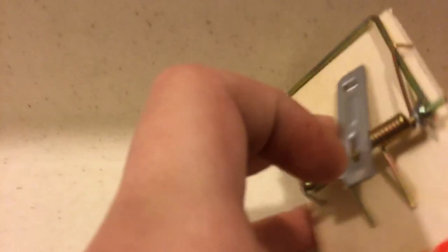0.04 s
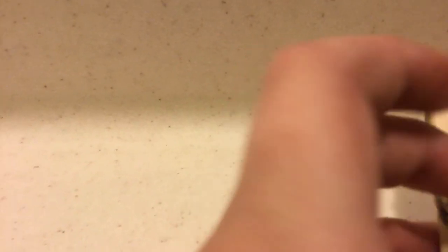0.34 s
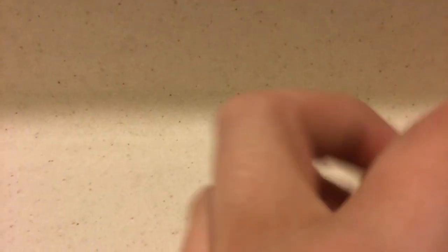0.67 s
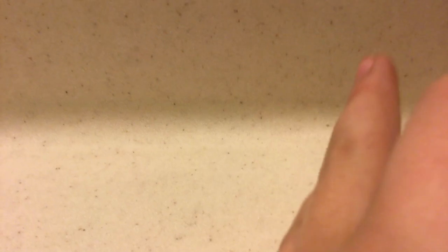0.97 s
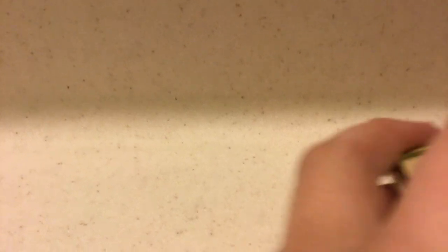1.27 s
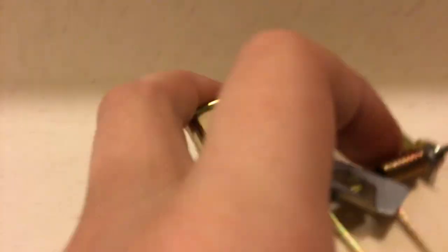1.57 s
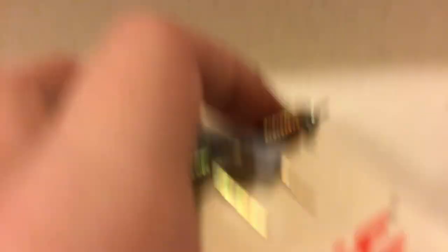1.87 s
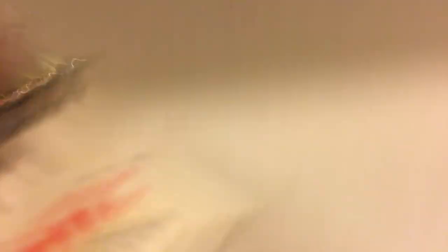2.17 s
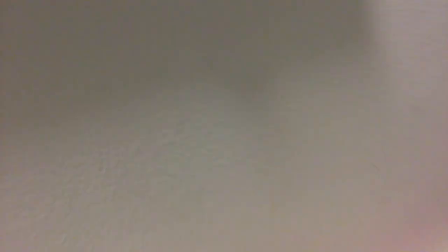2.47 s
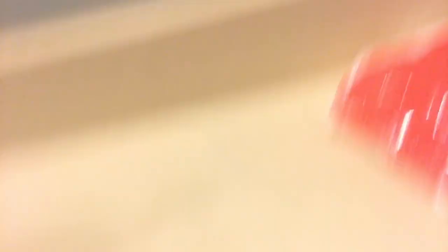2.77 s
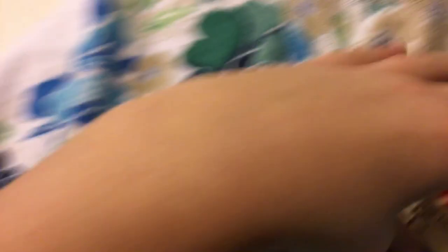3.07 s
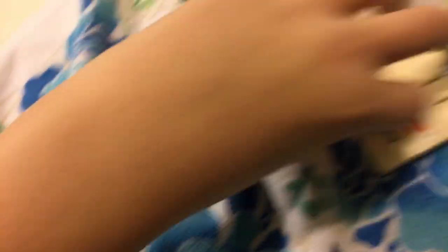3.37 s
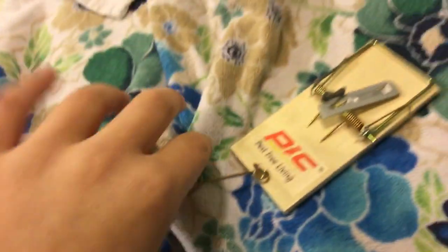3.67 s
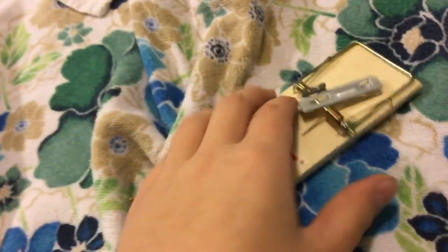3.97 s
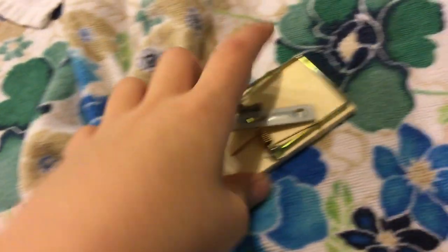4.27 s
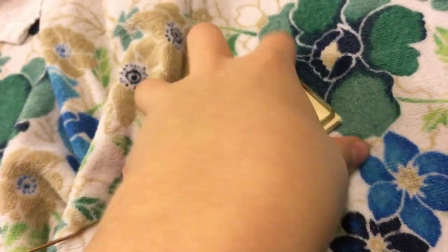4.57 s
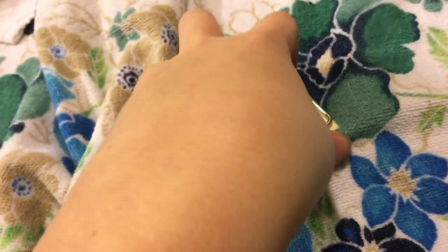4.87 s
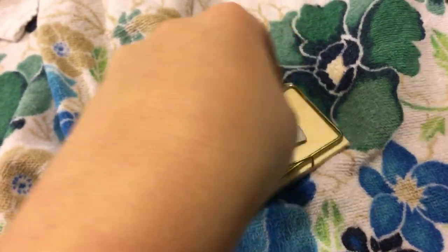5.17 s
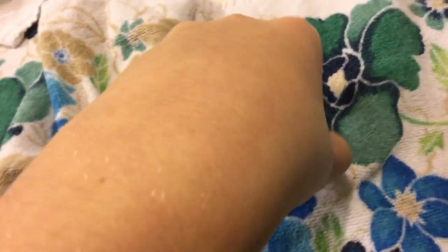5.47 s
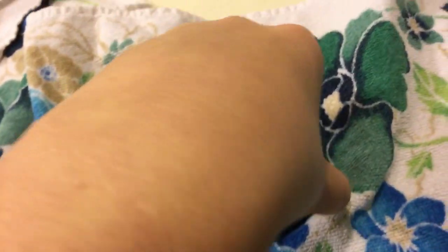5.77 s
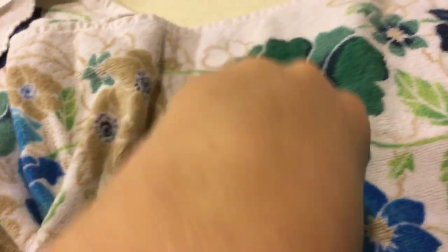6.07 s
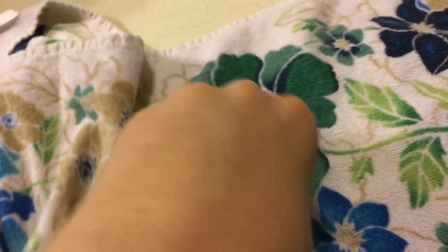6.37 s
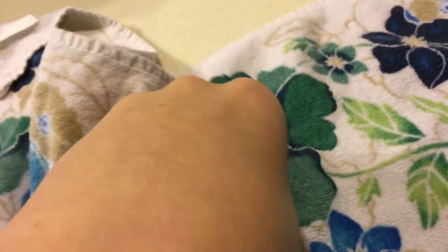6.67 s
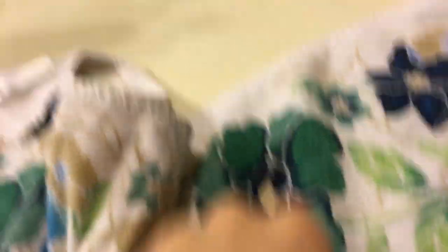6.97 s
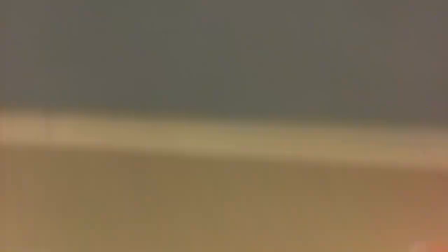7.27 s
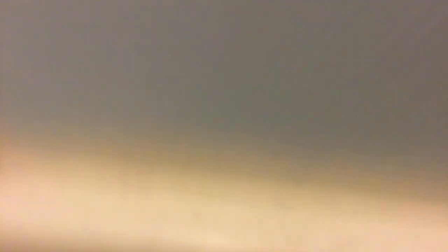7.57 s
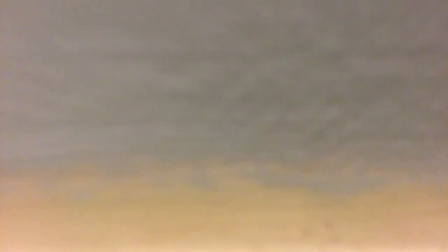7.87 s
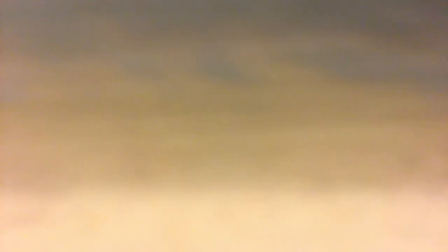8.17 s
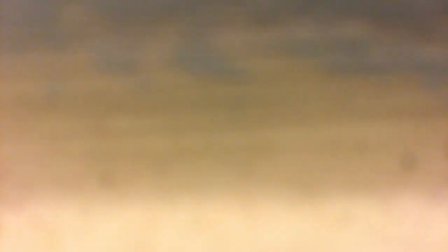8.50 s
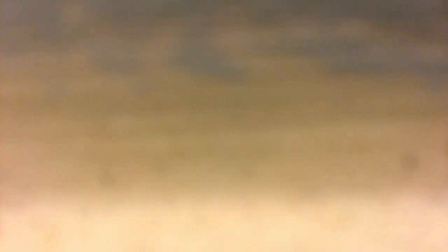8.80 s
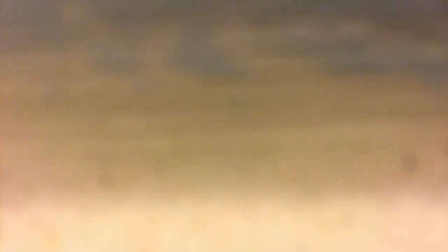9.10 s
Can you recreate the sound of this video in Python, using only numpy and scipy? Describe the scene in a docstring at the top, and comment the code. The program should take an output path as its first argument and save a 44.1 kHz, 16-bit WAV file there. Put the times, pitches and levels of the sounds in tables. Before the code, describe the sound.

A wooden mouse trap is handled close to a hand-held microphone in a small, quiet room. For the first 1.2 seconds its wires click and rattle lightly, with a faint wooden scrape and a small metal jingle. Soft skin rubbing, muffled bumps and fingernail taps follow, leading to a loud, sharp knock on the microphone at 2.3 seconds and a brief, faint, low finger squeak. From 2.7 to 4.2 seconds the trap clinks and rattles again, sharpest at about 3.1 and 3.4. It is then nudged on cloth, giving sparse faint ticks, tiny pings and a very soft rustle, with clearer clicks around 7 seconds. From 7.8 to 8.4 seconds the microphone is set down with loud, overloaded knocks: two heavy thumps, then a quick clattering cluster with rubbing. A few faint ticks follow over low room hush until about 9 seconds.

```python
"""Handling a mouse trap

In a small room, close to a hand-held phone, a spring-loaded wooden mouse trap is picked up from a
counter and nudged about on a cloth. Its loose wires chatter on the board and ring the spring, the bait
pedal and the holding bar; skin and cloth rub. The hand bumps the phone, and near the end sets it down
with knocks that overload the microphone."""
import sys
import numpy as np
from scipy import signal
from scipy.fft import rfft, irfft
from scipy.io import wavfile
from scipy.ndimage import map_coordinates

SR = 44100
rng = np.random.default_rng(int(sys.argv[2]) if len(sys.argv) > 2 else 0)


def store_pcm(level_fs):
    """Save levels as 16-bit WAV."""
    pcm = np.round(np.clip(level_fs, -1, 1) * 32767).astype(np.int16)
    wavfile.write(sys.argv[1], SR, np.atleast_2d(pcm).T)


N = 403074
TIME = np.arange(N) / SR
OFF_COUNTER_S, ON_CLOTH_S = 1.3, 3.25  # the trap leaves the counter, then lands on the cloth


# Wire chatter on the board. Each row: start in seconds, length in seconds, relative level in dB.
RATTLES = [(0.0795, 0.0012, -16), (0.103, 0.0047, -30), (0.121, 0.033, -39), (0.133, 0.00072, -36),
           (0.148, 0.0031, -26), (0.186, 0.0024, -26), (0.259, 0.00074, -29), (0.7477, 0.0082, -27),
           (0.7575, 0.0093, -19), (0.807, 0.0078, -37.5), (0.958, 0.0084, -29.5), (0.994, 0.003, -17.5),
           (1.005, 0.0014, -26), (1.05, 0.00048, -42), (1.1015, 0.00088, -44), (1.194, 0.0031, -33.5),
           (2.697, 0.003, -39), (2.711, 0.0077, -31.5), (2.764, 0.041, -41.5), (3.002, 0.012, -46),
           (3.025, 0.0044, -39.5), (3.041, 0.0049, -40), (3.078, 0.0018, -35), (3.127, 0.0034, -14.5),
           (3.327, 0.013, -35.5), (3.357, 0.15, -38.5), (3.405, 0.011, -28.5), (3.43, 0.0034, -20.5),
           (3.52, 0.0077, -30.5), (3.618, 0.055, -45.5), (3.683, 0.0079, -34), (4.096, 0.011, -41.5),
           (4.128, 0.0014, -29.5), (4.156, 0.015, -33.5), (4.597, 0.0093, -50.5), (4.671, 0.00084, -35),
           (5.254, 0.016, -43), (5.276, 0.046, -53.5), (5.366, 0.013, -49), (5.484, 0.045, -40.5),
           (5.8, 0.01, -59), (6.161, 0.012, -51.5), (6.615, .012, -64), (6.911, 0.019, -45.5),
           (6.991, 0.0057, -39), (7.118, 0.039, -46.5), (7.475, 0.054, -51), (8.534, 0.087, -59)]
# Wire on wire, the board silent. Each row: start in seconds, relative level in dB.
LONE_TICKS = [(0.345, -40.5), (0.598, -35), (2.454, -45.5), (6.939, -26), (8.544, -38.5), (9.058, -48)]
# Pings of the loose holding bar. Each row: start in seconds, level in dB.
BAR_PINGS = [(4.671, -52), (5.258, -57), (5.483, -49), (7.133, -50.5)]
# Modes of the spring with its bail, and of the bar. Each row: frequency in Hz, gain in dB, t60 in seconds.
SPRING_MODES = [(2055, -3, 0.076), (2876, -1, 0.065), (4770, -5, 0.038), (6800, -8, 0.064),
                (8470, -3.5, 0.054), (12900, -4, 0.067)]
BAR_MODES = [(8620, 8.5, 0.23), (11300, -7, .15), (15200, -4, .15)]
# Tone of struck wire, board and counter. Each row: frequency in Hz, gain in dB.
WIRE_COLOUR = [(4500, -33), (6500, -7.5), (9000, 6.5), (12000, 8.5), (16000, -4)]
WOOD_COLOUR = [(150, -28.5), (900, -20.5), (1400, -2.5), (2200, 2), (4200, -2), (6000, -1.5), (8000, -27.5)]
COUNTER_COLOUR = [(90, -26.5), (280, 3.5), (500, -11.5), (1500, -4.5), (4000, -39)]

def trap(wire_t60=0.0043, drag_s=0.0065, cloth_db=-7.5):
    """Close by, wire chatter ticks on metal and wood and rings the spring; the holding bar pings."""
    track = np.zeros(N)
    lead, t, ring_t = seconds(.04), seconds(.16), seconds(.3)
    for start, length, level_db in RATTLES:
        length = max(length, .0005)
        # light touches are duller, with more wood than wire; the cloth muffles the board
        wood_db = -22 + 0.48 * level_db + cloth_db * (start > ON_CLOTH_S)
        # the wire drags, slips free and bounces, then the shaken parts settle
        drag = undb(-20) * unit(rng.standard_normal(len(lead)) * np.exp(-lead[::-1] / drag_s))
        burst = unit(chatter(t, length, bounce_s=0.00091, scatter_db=6, sag_db=-7))
        settling = undb(-14) * unit(chatter(t, 0.17, bounce_s=0.0021, scatter_db=2.5, sag_db=-39))
        force = np.concatenate([drag, burst + settling])
        parts = [(tick(ring_t, WIRE_COLOUR, t60=wire_t60), level_db),
                 (tick(ring_t, WOOD_COLOUR, t60=0.025), wood_db),
                 (ring(SPRING_MODES, ring_t, scatter_db=4.5, detune=0.015), level_db - 12),
                 (coil(ring_t), level_db - 6)]
        if start < OFF_COUNTER_S:
            parts.append((tick(ring_t, COUNTER_COLOUR, t60=0.047), wood_db - 12))
        weight = np.sqrt((length + 0.0012) * SR)  # a longer burst carries more energy
        for response, db in parts:
            add(track, start - lead[-1], weight * undb(db) * unit(signal.fftconvolve(force, response)))
    for start, db in LONE_TICKS:
        add(track, start, undb(db + 22) * unit(tick(ring_t, WIRE_COLOUR, t60=wire_t60)))
    for start, db in BAR_PINGS:
        add(track, start, undb(db) * ring(BAR_MODES, ring_t))
    return track


def chatter(t, length, bounce_s, scatter_db, sag_db):
    """Force of a wire that lands and bounces on for a while."""
    gaps, sizes = rng.uniform(.2, 1.8, 256), rng.standard_normal(256)
    starts = (np.cumsum(gaps) - gaps[0]) * bounce_s
    gains = undb(scatter_db * sizes + sag_db * starts / length) * (starts < length)
    return np.bincount((starts * SR).astype(int), gains, len(t))[:len(t)]


def tick(t, points, t60, buzz_db=-27, buzz_t60=0.038):
    """Close, quickly damped modes blur into coloured noise; loose parts buzz faintly after."""
    envelope = fade(t, t60) + undb(buzz_db) * fade(t, buzz_t60)
    return colour(rng.standard_normal(len(t)) * envelope, points)


def coil(t, low_hz=1800, high_hz=15000, count=40, t60=.04):
    """The coil has many close modes that die fast; every contact wakes a different set."""
    modes = [(hz, 0, t60) for hz in rng.uniform(low_hz, high_hz, count)]
    return ring(modes, t, scatter_db=0.5)


# Shakes of the bait pedal. Each row: start in seconds, length in seconds, relative level in dB.
JINGLES = [(0.7444, 0.02, -38), (2.766, 0.015, -51.5), (3.314, 0.0041, -53), (3.329, 0.0087, -49.5),
           (3.349, 0.018, -49), (3.384, 0.077, -52)]
# Its modes. Each row: frequency in Hz, gain in dB.
PEDAL_MODES = [(2625, 8.5), (4183, -0.5), (5650, -8), (9085, 15.5), (11500, 8), (13745, 2.5)]

def pedal(t60=0.051):
    """The bait pedal bounces on its hinge and jingles in the same few clear modes each time."""
    track, t = np.zeros(N), seconds(.2)
    for start, length, level_db in JINGLES:
        force = chatter(t, length, bounce_s=.002, scatter_db=3, sag_db=0)
        weight = np.sqrt((length + t60 / 10) * SR)
        for hz, db in PEDAL_MODES:
            mode = np.sin(2 * np.pi * hz * t) * fade(t, t60)
            add(track, start, weight * undb(level_db + db) * unit(signal.fftconvolve(force, mode)))
    return track


# Pushes on the board. Each row: start in seconds, length in seconds, level in dB.
PUSHES = [(0, 0.24, -46), (0.33, 0.048, -45.5), (0.46, 0.28, -44.5), (3.58, 0.12, -51), (4.1, 0.11, -56.5)]
# Its resonances. Each row: frequency in Hz, width in Hz, gain in dB.
BOARD_RESONANCES = [(2000, 88, -8), (4400, 940, -12), (5680, 220, -4.5), (8800, 870, -12.5),
                    (12100, 1600, -14)]

def board_scrape():
    """The pushed board scrapes in fine ticks and sings in one resonance after another."""
    slips = friction(grain_db=7.5, flutter_db=2.5, flutter_rate=110)
    song = resonate(slips, BOARD_RESONANCES, sway_db=3.5, drift=.008)
    return song * gestures(PUSHES, attack_share=0.19, release_share=0.99, rest_db=-90.5)


# Blows on the phone. Each row: start in seconds, force in dB, softness in dB (more thump, less click).
KNOCKS = [(1.609, -39, -1.5), (1.751, -34.5, 1), (1.782, -29.5, 5), (2.228, -20, 3), (2.286, -13.5, -3.5),
          (2.2905, 1, 4), (6.912, -42.5, 4.5), (7.763, 3.5, 2.5), (7.7673, -2, 6.5), (7.847, 1, -2.5),
          (7.8522, 3.5, 0), (7.934, -22, 6), (7.938, -11, 0.5), (8.2251, -26.5, 4), (8.2601, -5, 4),
          (8.265, -5.5, 4), (8.278, -3.5, 2.5), (8.2805, 0, 1), (8.2936, -6.5, 0), (8.3027, -6, 3.5),
          (8.315, -9.5, -1), (8.835, -40, 4)]
# Modes of its case. Each row: frequency in Hz, gain in dB, t60 in seconds.
CASE_MODES = [(185, -4, 0.08), (260, 1, 0.05), (430, 2, 0.02), (535, 0, 0.032), (690, 1, 0.026),
              (1250, -1, 0.012)]
# Tone of a click on the case and of the palm's rumble. Each row: frequency in Hz, gain in dB.
CLICK_COLOUR = [(300, -8.5), (1500, 4), (3500, -1), (6000, -5.5), (8500, -1), (12000, 0), (16000, -16.5)]
PALM_COLOUR = [(25, -31.5), (70, -3.5), (150, 0.5), (280, -4.5), (450, -16), (700, -9), (1100, -20.5),
               (5000, -35)]

def phone_knocks(click_t60=0.015, grit_t60=.026, rumble_t60=0.081, thump_lag_s=0.002):
    """Right at the microphone, each blow gives a gritty click, a ring of the case, a thump, a shudder."""
    clicks, body, rumble = np.zeros((3, N))
    t = seconds(.2)
    for start, force_db, soft_db in KNOCKS:
        click_db, low_db = force_db - soft_db, force_db + soft_db
        add(clicks, start, undb(click_db) * noise_burst(t, click_t60))
        # a faint hiss swells just before each knock
        add(clicks, start - t[-1], undb(force_db - 26) * noise_burst(t[::-1], grit_t60))
        # a hard blow skids on in tiny jolts
        jolts = rng.standard_normal(len(t)) * waver(9, rate=1000)[:len(t)]
        add(clicks, start, undb(click_db - 22) * jolts * fade(t, grit_t60))
        add(body, start, undb(force_db - 11) * ring(CASE_MODES, t, scatter_db=6.5, detune=0.045))
        quickness = 2 ** (0.38 * (6.5 - soft_db))  # a harder blow's thump is over sooner
        add(body, start + thump_lag_s, undb(low_db - 4) * thump(quickness * t))
        add(rumble, start, undb(low_db - 22) * noise_burst(t, rumble_t60))
    return colour(clicks, CLICK_COLOUR) + body + colour(rumble, PALM_COLOUR)


def thump(t, first_hz=175, last_hz=88):
    """The phone rocks on the soft hand and comes back to rest; the pitch sinks as the grip yields."""
    hz = last_hz + (first_hz - last_hz) * np.exp(-t / 0.0094)
    damping = np.exp(-(t / .016) ** 2)
    rocking = np.sin(2 * np.pi * np.cumsum(hz) / SR) * damping
    recoil = t * damping
    return rocking - recoil * rocking.sum() / recoil.sum()


# Fingernail taps and ticks of the shifting case. Each row: start in seconds, level in dB.
NAIL_TAPS = [(2.0576, -15), (2.2026, -19.5), (2.2115, -24.5), (2.228, -22), (8.137, -37.5), (8.2, -32.5),
             (8.3245, -28), (8.36, -45)]
CASE_TICKS = [(2.284, -21), (2.2915, 1.5), (2.3163, -29), (2.326, -30.5), (2.4, -29), (7.782, -15),
              (7.8657, -17), (7.9443, -21), (7.9547, -21.5), (8.002, -15), (8.377, -30)]
# Their tone. Each row: frequency in Hz, gain in dB.
NAIL_COLOUR = [(100, -15), (300, -2), (900, -11.5), (1800, 1), (3500, -8), (7000, -13.5), (16000, -35)]
CASE_COLOUR = [(1500, -8.5), (5000, -8.5), (11000, -2.5), (16000, -8)]

def phone_taps():
    """Beside the microphone, fingernails tap and the case ticks as it shifts on the phone."""
    return snaps(NAIL_TAPS, NAIL_COLOUR, t60=0.011) + snaps(CASE_TICKS, CASE_COLOUR, t60=0.0043)


def snaps(rows, points, t60):
    """Very short dry contacts, all of one colour."""
    track, t = np.zeros(N), seconds(.03)
    for start, db in rows:
        add(track, start, undb(db) * noise_burst(t, t60))
    return colour(track, points)


# Skin stroking skin or cloth. Each row: start in seconds, length in seconds, relative level in dB.
STROKES = [(0.85, 0.2, -56), (1.4, 0.12, -50), (1.53, 0.24, -47.5), (1.86, 0.14, -54.5), (2.03, 0.2, -51.5),
           (2.252, 0.033, -34), (4.24, 0.17, -60), (6.03, 0.54, -60), (7.41, 0.09, -59), (7.85, 0.057, -48),
           (8.08, 0.08, -45), (8.46, 0.1, -57.5)]
# Resonances of the hollow under the hand. Each row: frequency in Hz, width in Hz, gain in dB.
HAND_HOLLOW = [(3059, 480, -7.5), (4500, 700, -4.5), (7000, 340, -4), (9323, 540, 0.5), (11300, 1100, 1.5)]
# Tone of the cloth and the padding under it. Each row: frequency in Hz, gain in dB.
CLOTH_COLOUR = [(500, -20), (3500, -12.5), (6000, -14.5), (9000, -1), (11500, 4.5), (16000, -17)]
PADDING_COLOUR = [(150, -29), (400, 3), (650, -7), (4000, -44)]

def rubbing():
    """Over the counter, skin scrapes through the hollow of the hand; later the padded cloth hisses."""
    catches = friction(grain_db=11, flutter_db=3.5, flutter_rate=120)
    skin = undb(1) * resonate(catches, HAND_HOLLOW, sway_db=3.5, drift=.04)
    scratches = undb(-11) * colour(catches * waver(7.8, rate=62), CLICK_COLOUR)
    hiss = colour(friction(grain_db=3, flutter_db=2, flutter_rate=25), CLOTH_COLOUR)
    scuff = undb(-11) * colour(rng.standard_normal(N), PADDING_COLOUR)
    rub = np.where(TIME > ON_CLOTH_S, hiss + scuff, skin + scratches)
    return rub * gestures(STROKES, attack_share=0.42, release_share=4.1, rest_db=-74.5)


# Fingers tightening on the phone. Each row: start in seconds, length in seconds, relative level in dB.
SQUEEZES = [(0.05, 0.54, -55.5), (1.5, 0.18, -46), (1.73, 0.099, -41), (1.98, 0.099, -39.5),
            (2.16, 0.11, -41), (3.19, 0.032, -50.5), (7.84, 0.13, -37), (8.03, 0.26, -41.5),
            (8.25, 0.096, -28), (8.45, 0.57, -57.5)]

def grip(low_hz=130, high_hz=650, cycles=9, count=150):
    """Fingers rub on the case, and now and then a pad slips with a soft bump of its own pitch."""
    track = undb(-4) * colour(friction(grain_db=12.5, flutter_db=4.5, flutter_rate=27), PALM_COLOUR)
    t = seconds(.1)
    for when, pitch, size in rng.random((count, 3)):
        hz = low_hz * (high_hz / low_hz) ** pitch
        envelope = fade(t, cycles / hz) * (1 - np.exp(-2 * hz * t))
        bump = np.sin(2 * np.pi * hz * t) * envelope
        add(track, when * N / SR, undb(20) * size ** 2 * bump)
    return track * gestures(SQUEEZES, attack_share=0.061, release_share=1.7, rest_db=-71)


def finger_groan(start=2.472, length=0.14, hz=183, db=-39, overtone_db=-15):
    """A fingertip sticks and slips on the case in a brief low groan."""
    track, t = np.zeros(N), seconds(length)
    phase = 2 * np.pi * np.cumsum(hz * (1 + .05 * walk(60)[:len(t)])) / SR
    swell = np.interp(t / length, [0, .15, 1], [0, 1, 0])
    add(track, start, undb(db) * swell * (np.sin(phase) + undb(overtone_db) * np.sin(2 * phase)))
    return track


def room_echoes(x, low_t60=0.38, treble_t60=.2, split_hz=6000, first_echo_s=0.0012):
    """Diffuse echoes off the walls of a small room; the treble dies sooner."""
    t = seconds(.6)
    noise = rng.standard_normal(len(t))
    low = signal.sosfilt(signal.butter(1, split_hz, fs=SR, output="sos"), noise)
    tail = low * fade(t, low_t60) + (noise - low) * fade(t, treble_t60)
    return signal.fftconvolve(x, unit(tail * (t > first_echo_s)))[:N]


# Tone of the still room. Each row: frequency in Hz, gain in dB.
ROOM_COLOUR = [(30, -26), (60, -5.5), (120, -3), (350, -9), (500, -18), (4000, -30), (16000, -37)]

def room_tone(level_db=-63.5):
    """A faint low rush all round the microphone, its level drifting slightly."""
    return colour(rng.standard_normal(N), ROOM_COLOUR) * undb(level_db + .5 * walk(1))


def friction(grain_db, flutter_db, flutter_rate):
    """Dense tiny slips of uneven size, under a pressure that wavers."""
    slips = rng.standard_normal(N) * undb(grain_db * np.clip(rng.standard_normal(N), -2, 2))
    return np.sqrt(N) * unit(slips * waver(flutter_db, flutter_rate))


def gestures(rows, attack_share, release_share, rest_db):
    """Gain of hand movements: each swells, holds and dies to a resting level, longer ones more slowly."""
    gain = np.full(N, undb(rest_db))
    for start, length, db in rows:
        progress = (TIME - start) / length
        swell = np.clip(progress / attack_share, 0, 1)
        release = fade(np.maximum(progress - 1, 0), release_share)
        gain = np.maximum(gain, undb(db) * swell * release)
    return gain


def ring(modes, t, scatter_db=0, detune=0):
    """Decaying modes; each grip and contact point can weight and detune them anew."""
    hz, db, t60 = np.transpose(modes)[:, :, None]
    weight, shift = np.clip(rng.standard_normal((2, *hz.shape)), -2, 2)
    gain = undb(db + scatter_db * weight) * rng.choice([-1, 1], hz.shape)
    return np.sum(gain * np.sin(2 * np.pi * hz * (1 + detune * shift) * t) * fade(t, t60), axis=0)


def resonate(x, rows, sway_db, drift, rate=12):
    """Resonances that swell and fade each on its own, and glide together as the contact moves."""
    song = np.zeros(N)
    for hz, width, db in rows:
        band = signal.lfilter(*signal.iirpeak(hz, hz / width, fs=SR), x)
        song += undb(db + sway_db * walk(rate)) * band
    place = np.cumsum(1 + drift * walk(rate))
    return np.sqrt(N) * unit(map_coordinates(song, [place], mode="mirror"))


def colour(x, points, size=2048):
    """Causal filter of unit energy that follows (Hz, dB) points."""
    hz, db = np.transpose(points)
    bin_hz = np.arange(size + 1) * SR / (2 * size)
    log_gain = np.log(undb(np.interp(np.log(bin_hz + 1), np.log(hz), db)))
    cepstrum = irfft(log_gain)
    cepstrum[1:size] *= 2  # fold to minimum phase
    cepstrum[size + 1:] = 0
    response = unit(irfft(np.exp(rfft(cepstrum))))
    return signal.fftconvolve(x, response)[:len(x)]


def walk(rate):
    """Random drift with a spread near one, taking `rate` steps a second."""
    steps = rng.standard_normal(4096)
    return np.interp(TIME * rate, np.arange(len(steps)), steps)


def waver(spread_db, rate):
    """A gain that wanders at random about one."""
    return undb(spread_db * np.clip(walk(rate), -2, 2))


def noise_burst(t, t60):
    """White noise that dies away."""
    return rng.standard_normal(len(t)) * fade(t, t60)


def fade(t, t60):
    """Exponential decay, 60 dB down after t60."""
    return np.exp(-np.log(1000) * t / t60)


def undb(db):
    """Decibels to gain."""
    return 10 ** (np.asarray(db) / 20)


def unit(x):
    """Scale to an energy of one."""
    return x / np.sqrt(np.sum(x ** 2) + 1e-18)


def seconds(length):
    """Time axis of a short sound."""
    return np.arange(max(int(length * SR), 2)) / SR


def add(track, start, sound):
    """Mix a sound into a track at a start in seconds."""
    i = max(int(start * SR), 0)
    track[i:i + len(sound)] += sound[:max(N - i, 0)]


def scene(drawn_back_s=3.9):
    """Trap, hands and phone in mono, over the quiet tone of the room."""
    handled = trap() + pedal() + board_scrape()
    bumps = phone_knocks() + phone_taps()
    air = room_tone()
    # once the phone is drawn back from the trap, more of the room is heard
    echo_db = -13 + 5.5 * (TIME > drawn_back_s)
    # knocks reach the microphone through the case, so the room hardly hears them
    echoes = room_echoes(undb(echo_db) * handled + undb(-37) * bumps)
    return (handled + bumps + rubbing() + grip() + finger_groan() + air + echoes)[None]


def record(dry, bass_cut_hz=42, top_hz=16000):
    """The phone's microphone drops the deepest bass, overloads on the knocks and cuts the top."""
    thin = signal.sosfilt(signal.butter(3, bass_cut_hz, "high", fs=SR, output="sos"), dry)
    overloaded = np.tanh(thin)
    return signal.sosfilt(signal.ellip(10, .2, 80, top_hz, fs=SR, output="sos"), overloaded)


dry = scene()
out = record(dry)
store_pcm(out)
```